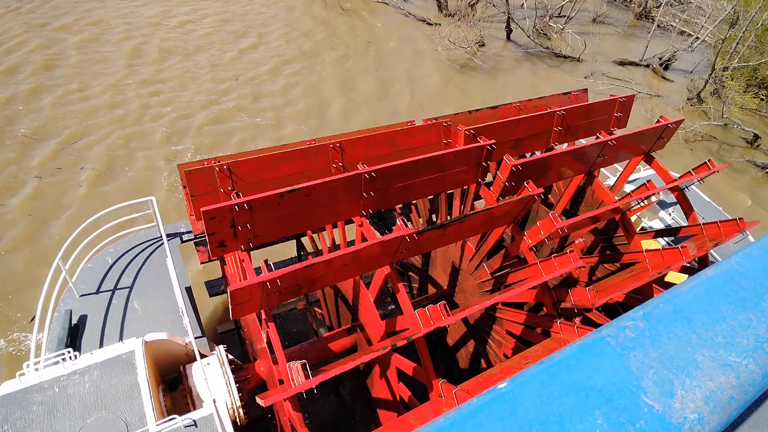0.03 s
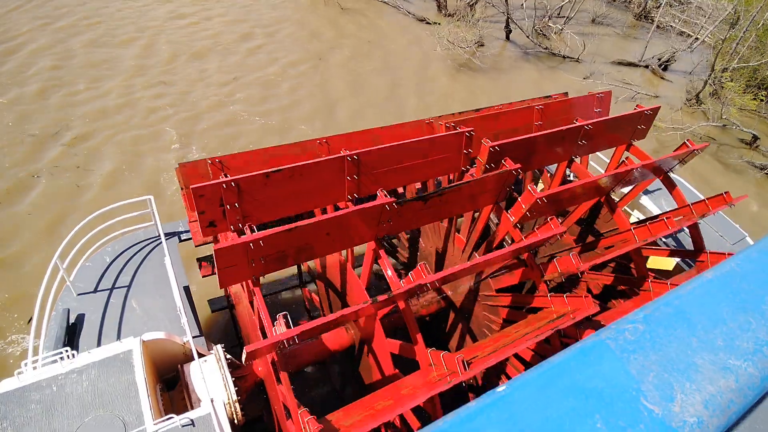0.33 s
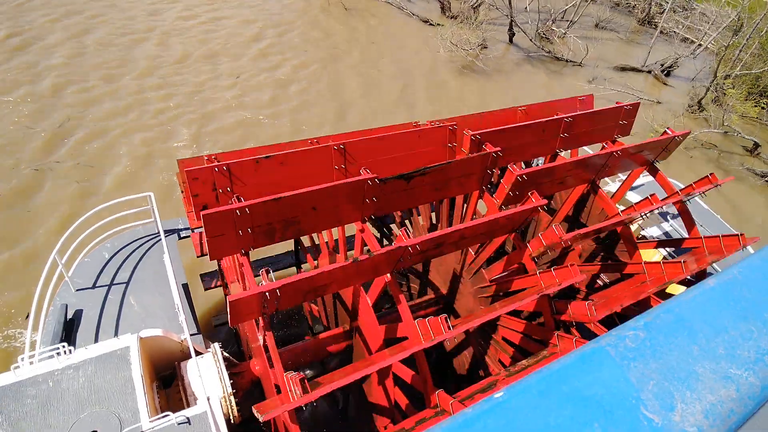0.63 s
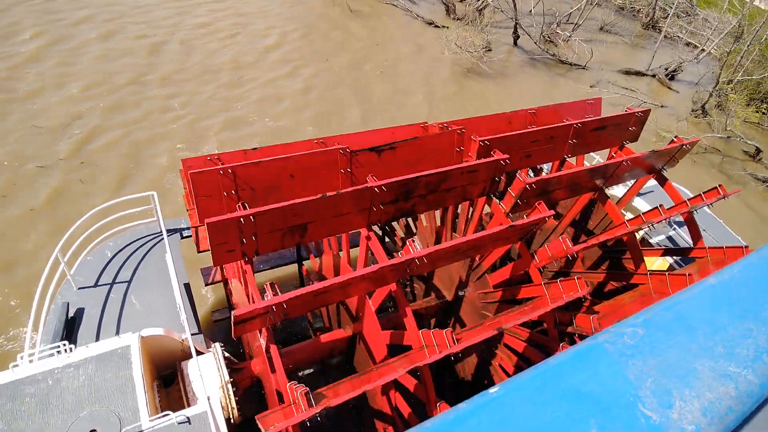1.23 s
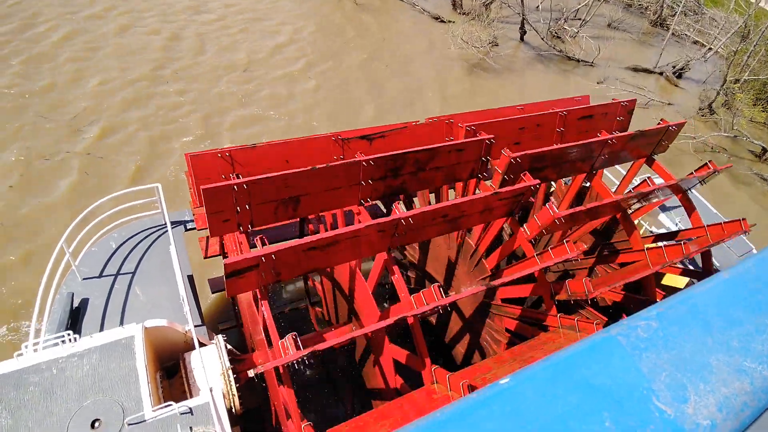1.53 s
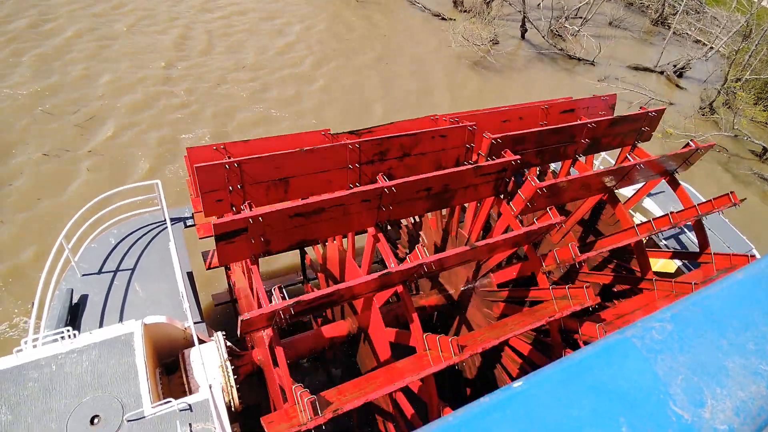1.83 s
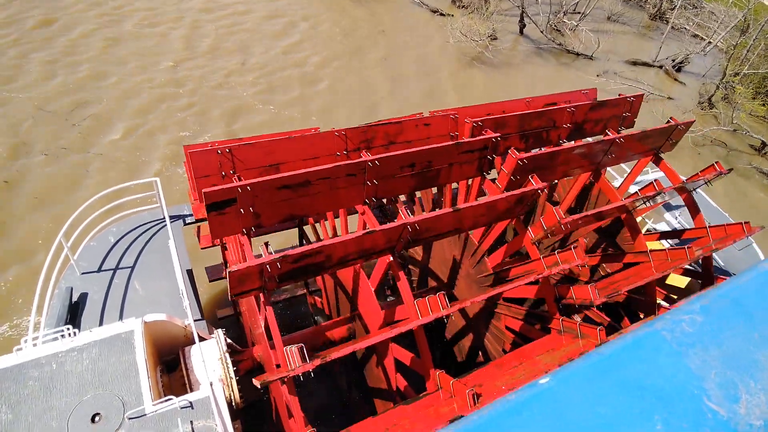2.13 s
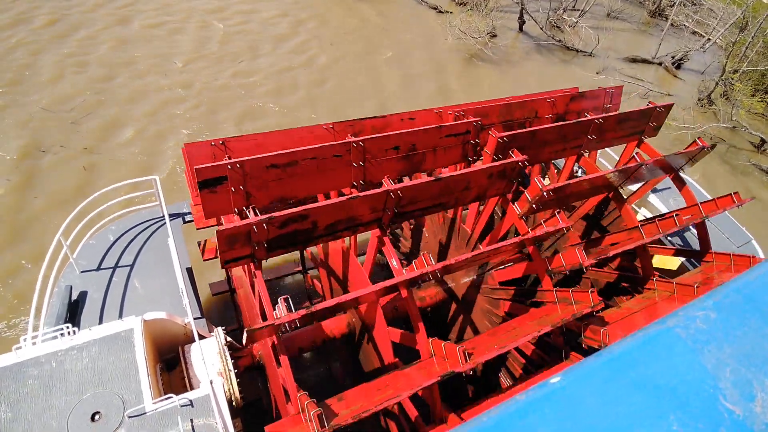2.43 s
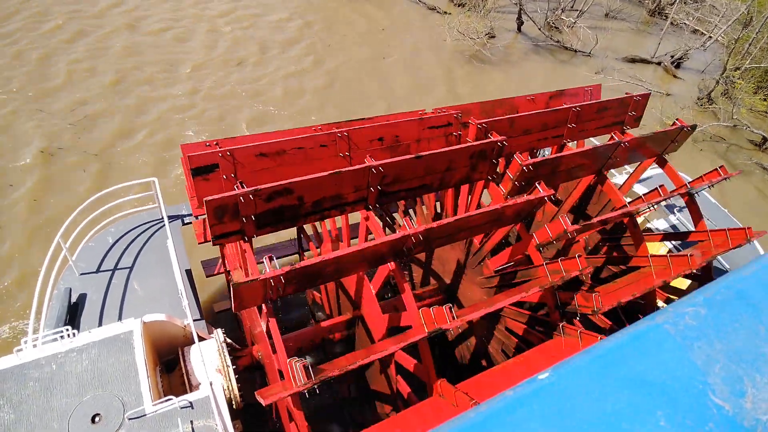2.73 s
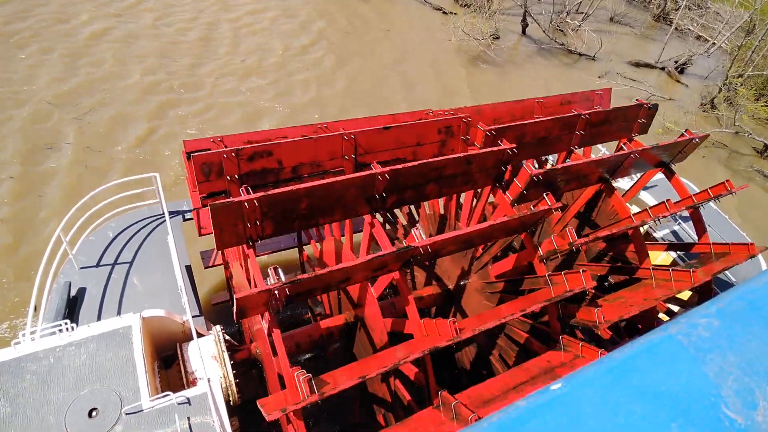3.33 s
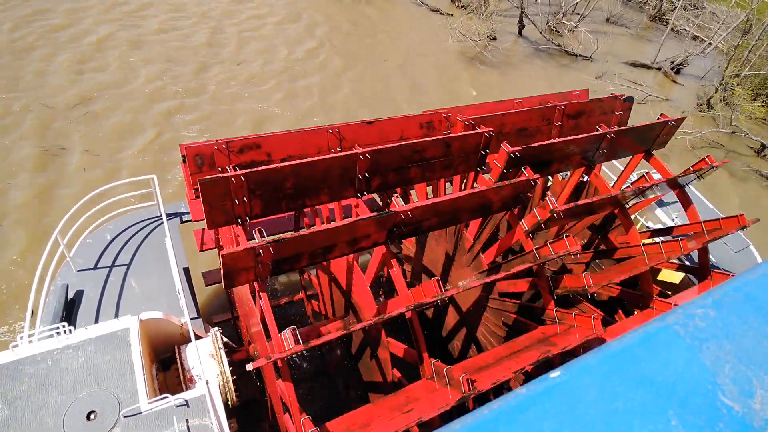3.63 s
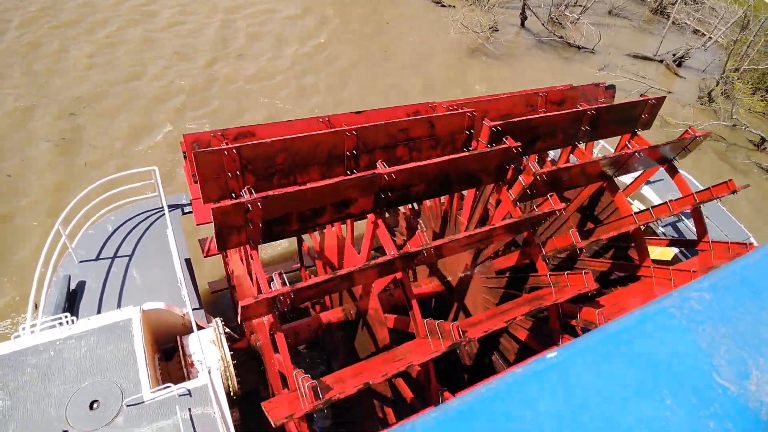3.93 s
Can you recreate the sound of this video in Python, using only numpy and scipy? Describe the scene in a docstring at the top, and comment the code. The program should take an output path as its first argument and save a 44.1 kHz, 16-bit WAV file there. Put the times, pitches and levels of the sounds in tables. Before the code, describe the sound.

A gust of wind rumbles and crackles on the microphone above a river boat's turning paddle wheel as spray hisses. The gust eases, leaving softer buffeting over rushing water, a low engine rumble and a faint machine whine.

```python
"""On the deck of a river boat, above its turning paddle wheel.
Wind buffets the microphone's two ports (its openings), each on its own. A gust makes them ring
and crackle while fine spray hisses, then eases after two seconds. Underneath, churned water rushes
and swells, three droplets tick, and the engine rumbles with a faint machine whine."""
import sys
import numpy as np
from scipy import signal
from scipy.fft import rfft, irfft
from scipy.io import wavfile

SR = 44100
rng = np.random.default_rng(int(sys.argv[2]) if len(sys.argv) > 2 else 0)


def wav_out(sig):
    """Save sig, one row per channel (or a flat mono array), as 16-bit PCM at SR to the path in sys.argv[1]."""
    wavfile.write(sys.argv[1], SR, np.round(np.clip(np.atleast_2d(sig).T, -1, 1) * 32767).astype(np.int16))


N = 176400
TIME = np.arange(N) / SR


def from_db(db):
    """Turn decibels into a factor to multiply by."""
    return 10 ** (np.asarray(db) / 20)


def rms_one(x):
    """Scale a signal so that its average strength (rms) is 1."""
    return x / np.sqrt(np.mean(x ** 2) + 1e-20)


def in_time(rows):
    """Join a table's points in time with straight lines, one curve for each level column."""
    times, *columns = np.transpose(rows)
    return np.array([np.interp(TIME, times, column) for column in columns])


def panned(db):
    """Left and right gains that make the left db louder and keep the total power."""
    return rms_one(from_db(np.array([[db], [-db]]) / 2))


def colour(x, spectrum):
    """Shape the lows and highs by a table with one level column, or one for each side."""
    hz, *columns = np.transpose(spectrum)
    log_hz = np.log(np.maximum(np.arange(N // 2 + 1) * SR / N, 1))
    gains = from_db([np.interp(log_hz, np.log(hz), column) for column in columns])
    return irfft(rfft(x) * gains, N)


def white():
    """Separate white noise for left and right."""
    return rng.standard_normal((2, N))


def drift(hz):
    """A smooth random wobble for each side, about 1 in size and mostly slower than hz."""
    pole = np.exp(-2 * np.pi * hz / SR)
    slow = signal.lfilter([1], [1, -2 * pole, pole * pole], rng.standard_normal((2, N + SR)))
    return 3 * np.tanh(rms_one(slow[:, SR:]) / 3)   # round off the biggest swings


def band_pass(x, edges_hz):
    """Keep what lies between two frequencies."""
    return signal.sosfilt(signal.butter(2, edges_hz, "band", fs=SR, output="sos"), x)


def wavering_tone(hz, width_hz):
    """Noise sent twice through one resonance becomes an unsteady tone."""
    pole = np.exp(-np.pi * width_hz / SR)
    resonance = [1, 0, -1, 1, -2 * pole * np.cos(2 * np.pi * hz / SR), pole * pole]
    return rms_one(signal.sosfilt([resonance, resonance], white()))


def wind_buffeting(eddies):
    """Eddies (swirls of air) pass each port and swell all its octaves at once."""
    # wind pressure on the ports: t/s, left level/dB, right level/dB
    pressure = [(0.29, -10, -15.5), (0.45, -9.5, -11), (0.62, -10, -10.5), (0.78, -9.5, -13),
                (0.97, -10, -10), (1.18, -11, -9), (1.4, -12.5, -14), (1.55, -10, -10.5),
                (1.75, -13.5, -10.5), (1.97, -9, -10), (2.15, -11.5, -12.3), (2.35, -14, -10),
                (2.58, -16.7, -11.5), (2.8, -14.5, -11.5), (3.05, -17, -12), (3.3, -13, -12.9),
                (3.6, -14, -13.5), (3.95, -14, -12.5)]
    # tone colour of the buffeting: f/Hz, left level/dB, right level/dB
    spectrum = [(25, -32, -27), (47.3, -15, -10.5), (77.7, 2, -1), (119, 1.5, -1), (186, -2, -1),
                (388, -6.5, -6), (690, -14, -9.5), (1248, -25, -19.5), (1815, -34.5, -29.5),
                (2740, -38.5, -36.5), (4640, -58, -62.5)]
    swing_db, rise_db = np.array([3, 1.2]), np.array([0, 1])   # at 400 Hz, per octave; left, right
    noises, rumble = (white(), white()), 0
    for k, hz in enumerate(25 * 2. ** np.arange(9)):
        octave = band_pass(noises[k % 2], [hz / np.sqrt(2), hz * np.sqrt(2)])
        depth_db = np.maximum(swing_db + rise_db * np.log2(hz / 400), 0)
        swells = from_db(depth_db[:, None] * eddies)
        rumble = rumble + octave * [rms_one(side) for side in swells]
    return from_db(in_time(pressure) - 1) * [rms_one(side) for side in colour(rumble, spectrum)]


def spray_hiss(eddies, flutter_db=1.4):
    """Fine spray hisses, brightest near 9 kHz, rising with the gust and fluttering with the eddies."""
    # strength of the hiss: t/s, level/dB
    gust = [(.28, -47.5), (.41, -39), (.7, -39), (.9, -40), (1.07, -38), (1.16, -34.5), (1.33, -41),
            (1.45, -40), (1.55, -37), (1.66, -39), (1.8, -38.5), (2.17, -41), (2.33, -46), (2.48, -43.5),
            (2.6, -49.5), (2.79, -50), (2.9, -47.7), (3.16, -48), (3.25, -45.5), (3.31, -50.5), (3.56, -47),
            (3.72, -49), (3.92, -46)]
    # tone colour of the hiss: f/Hz, left level/dB, right level/dB
    spectrum = [(2000, -3, -8), (4730, -9.5, -6.5), (5900, -2.5, -4), (7200, -4.5, -2), (9140, 2.5, -6.5),
                (10370, -7, -14), (11400, -5, -8), (14100, -8.5, -18), (15600, -17, -23)]
    hiss = rms_one(colour(white(), spectrum))
    return hiss * from_db(in_time(gust) + 3.5 + flutter_db * eddies)


def port_resonance(eddies, flutter_db=2.5):
    """The gust blows across the ports and makes them ring near 3 kHz."""
    # resonance of the ports: f/Hz, left level/dB, right level/dB
    spectrum = [(1000, -19, -19), (2000, -12, -16), (2520, -21, -10), (3030, 0, 2), (4000, -3, -2),
                (4700, -3, -3), (5730, -2.5, -7), (7000, -13, -10.5), (12000, -28, -27)]
    # how hard the gust blows them: t/s, level/dB
    blowing = [(.28, -41.5), (.42, -36.5), (.72, -34.5), (.87, -36), (.97, -33.5), (1.06, -34), (1.15, -31),
               (1.33, -36), (1.6, -36), (1.78, -34.5), (1.95, -34), (2.08, -40.5), (2.2, -38), (2.32, -45),
               (2.55, -50.5), (3.4, -54), (3.8, -62)]
    air = white() * from_db(flutter_db * eddies)
    return rms_one(colour(air, spectrum)) * from_db(in_time(blowing))


def wind_crackles(snap_cycles=.62, thump_s=.00098):
    """A hard eddy pushes, then pulls, with a bright crack and a low rasp; midway the port snaps."""
    # hard eddies: t/s, level/dB, left minus right/dB, half-length/s, extra rasp/dB, snap f/Hz
    hard_eddies = [(0.36, -25, 10, 0.0018, 7, 2600), (0.39, -28, 2, 0.0015, 1, 3000),
                   (0.523, -34, 8, .003, 16, 2000), (0.643, -27, 10, 0.0013, 10, 3200),
                   (.667, -21, 18, 0.0025, -8, 4300), (0.679, -17, 14, 0.001, -6, 3500),
                   (0.7407, -19, 14, 0.0011, -8, 4200), (0.743, -20.5, 8, 0.002, 5.5, 3000),
                   (0.801, -21, 4, 0.0023, 4, 3200), (0.826, -22, 14, 0.0012, 4, 3300),
                   (0.934, -29, -16, 0.0015, 10, 2800), (1.136, -21.5, 8, 0.0026, 10.5, 2300),
                   (1.241, -19, 11, 0.0026, 3, 3600), (1.2802, -10.5, 21, 0.0014, -1, 3300),
                   (1.2828, -9, 22, .001, -4, 2700), (1.304, -22, 15, 0.002, 7, 3400),
                   (1.326, -25, 12, 0.0016, 9, 3400), (1.37, -21, 10, 0.0007, -4, 3300),
                   (1.4005, -15, 28, 0.0018, -18, 3080), (1.6653, -14, 27, 0.0034, 1.5, 3200),
                   (1.72, -15.5, 20, 0.0016, 1.5, 2700), (1.759, -22, 3, 0.002, 7.5, 2400),
                   (1.820, -10, 20, 0.0012, -4, 4200), (1.8258, -13.5, 20, 0.0012, -6, 3300),
                   (1.848, -22, 16, 0.0008, -11, 3500), (1.9235, -12, 25, 0.00086, -12, 3500),
                   (1.934, -23.5, 8, 0.004, 9.5, 3500), (1.953, -22, 10, 0.002, 5, 2500),
                   (2.172, -24, 18, 0.012, 4.5, 2800), (2.285, -31.5, -4, 0.0048, 13, 2000),
                   (2.358, -30, 17, 0.0022, 14, 2600), (2.506, -30, -1, 0.0013, 4, 2400),
                   (2.883, -28, -21, 0.0019, 11, 2400), (3.055, -38, -17, 0.0013, 19, 2200),
                   (3.376, -35, 4, 0.0019, 8, 3000), (3.416, -39, 9, 0.0023, 19, 2000),
                   (3.447, -33, 15, 0.0025, 12, 2600), (3.583, -40, -4, 0.0022, 9, 2200)]
    # tone colour of the bright crack: f/Hz, level/dB
    crack_spectrum = [(1000, -1.5), (2000, -7.5), (3300, 8.5), (4400, -1.5), (5500, -10.5), (7000, -14),
                      (12000, -44)]
    # tone colour of the low rasp: f/Hz, level/dB
    rasp_spectrum = [(200, -4), (600, 2), (1200, -5), (2000, -9.5), (4000, -48)]
    crack_noise, rasp_noise = colour(white(), crack_spectrum), colour(white(), rasp_spectrum)
    out = np.zeros((2, N))
    for at_s, db, pan_db, half_s, rasp_db, snap_hz in hard_eddies:
        near = abs(TIME - at_s) < .02
        t = TIME[near] - at_s
        swell = np.exp(-(t / half_s) ** 2)
        crack = from_db(-5.5) * burst(crack_noise[:, near], swell)
        rasp = from_db(rasp_db + .5) * burst(rasp_noise[:, near], swell)
        snap_shape = np.exp(-(snap_hz * t / snap_cycles) ** 2)
        snap = from_db(3) * np.cos(2 * np.pi * snap_hz * t) * snap_shape
        thump = -from_db(-1) * t / thump_s * np.exp(-.5 * (t / thump_s) ** 2)
        out[:, near] += from_db(db) * panned(pan_db) * (crack + rasp + snap + thump)
    return out


def burst(noise, swell):
    """A puff of noise shaped by a swell, with that swell's energy on each side."""
    return np.array([rms_one(side * swell) for side in noise]) * np.sqrt(np.mean(swell ** 2))


def paddle_wheel(slosh_db=3, slosh_hz=38):
    """The paddles churn the water into a rush that swells and sloshes."""
    # strength of the rush: t/s, level/dB
    churn = [(.3, -46), (.8, -38), (1.15, -38), (1.45, -39), (1.8, -32), (2.05, -25), (2.2, -30),
             (2.31, -24), (2.45, -32), (2.9, -40), (3.3, -35.5), (3.7, -45.5), (4, -39)]
    # tone colour of churned water: f/Hz, left level/dB, right level/dB
    spectrum = [(100, -7, -19), (400, 1.5, -2.5), (1020, 1, 0), (1640, -4.5, -1.5), (2200, -17, -18.5),
                (3260, -14, -13.5), (4500, -32, -29), (12000, -33, -41)]
    level_db = in_time(churn) + slosh_db * drift(slosh_hz)[0]
    return from_db(level_db) * rms_one(colour(white(), spectrum))


def engine():
    """The engine rumbles steadily while a faint machine whine grows and fades."""
    # strength of the whine: t/s, level/dB
    whine_level = [(.3, -58), (2, -36), (2.7, -31.5), (3.2, -35), (4, -43)]
    rumble = from_db(-30) * wavering_tone(hz=101.9, width_hz=13.6)
    whine = from_db(in_time(whine_level)) * panned(-6.5) * wavering_tone(hz=1073, width_hz=51)
    return rumble + whine


def droplets(decay_s=.005, band_hz=(5000, 14000)):
    """Each droplet is a bright tick of noise that starts sharply and dies away."""
    # ticks of spray: t/s, level/dB, left minus right/dB
    ticks = [(1.059, -14.5, 12), (1.4905, -21, 8.5), (1.5658, -20, 9)]
    loudness = np.full((2, N), 1e-12)
    for at_s, db, pan_db in ticks:
        decay = (TIME >= at_s) * np.exp(-abs(TIME - at_s) / decay_s)
        loudness += from_db(db - 5) * panned(pan_db) * decay
    return band_pass(loudness * white(), band_hz)


def scene():
    """Wind on the microphone and hissing spray over the boat's own noise."""
    eddies = drift(hz=66)   # the same swirls shake the buffeting, the hiss and the ringing
    gust = wind_buffeting(eddies) + spray_hiss(eddies) + port_resonance(eddies) + wind_crackles()
    return gust + paddle_wheel() + engine() + droplets()


def record(dry):
    """The sound cuts in after a short silence; its tallest peaks and highest treble are trimmed."""
    start_s, fade_s, cutoff_hz = .2724, .0025, 15450
    faded = dry * np.clip((TIME - start_s) / fade_s, 0, 1)
    rounded = faded / (1 + faded ** 6) ** (1 / 6)
    return signal.sosfilt(signal.cheby1(12, .1, cutoff_hz, fs=SR, output="sos"), rounded)


dry = scene()
out = record(dry)
wav_out(out)
```